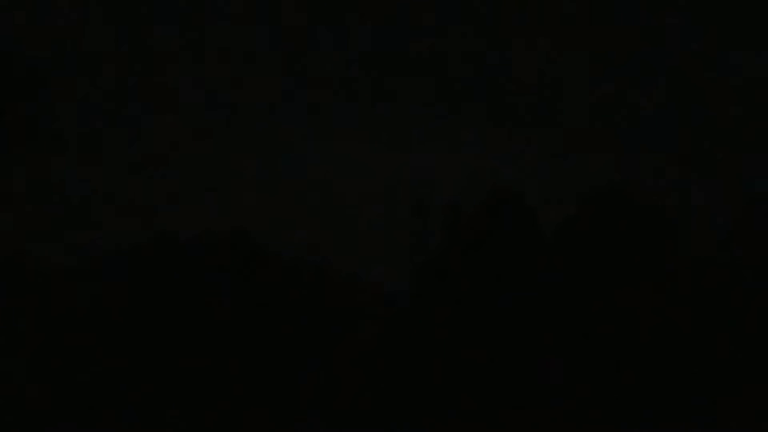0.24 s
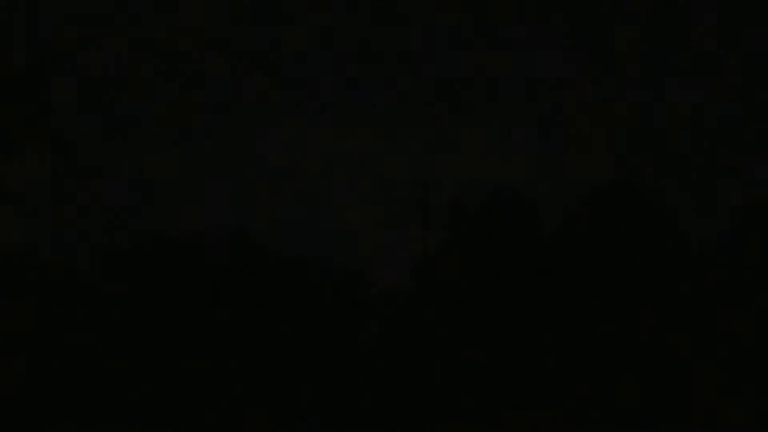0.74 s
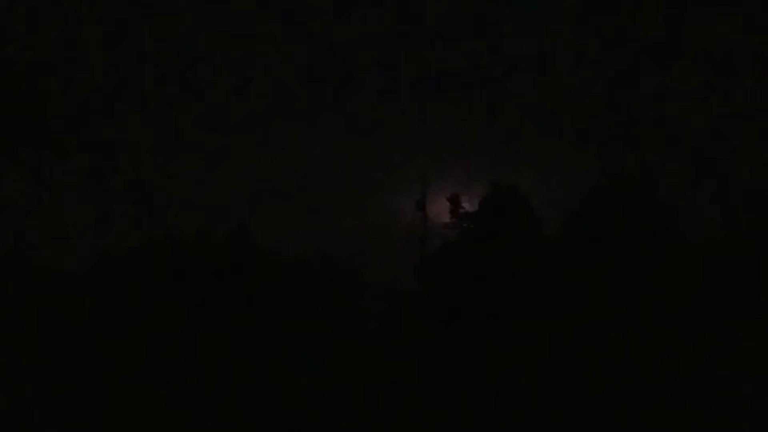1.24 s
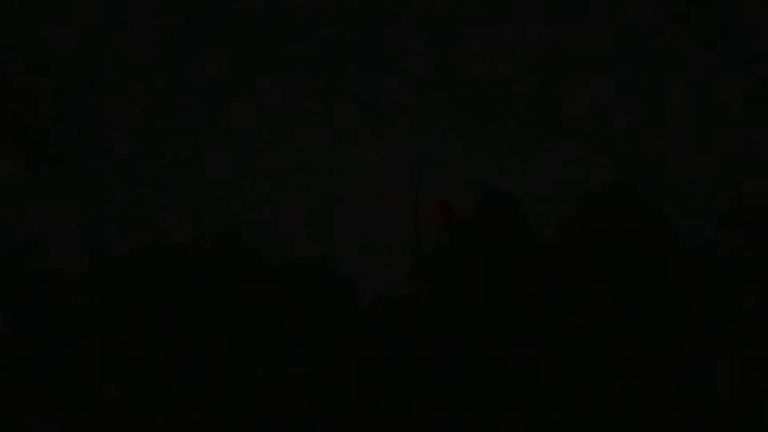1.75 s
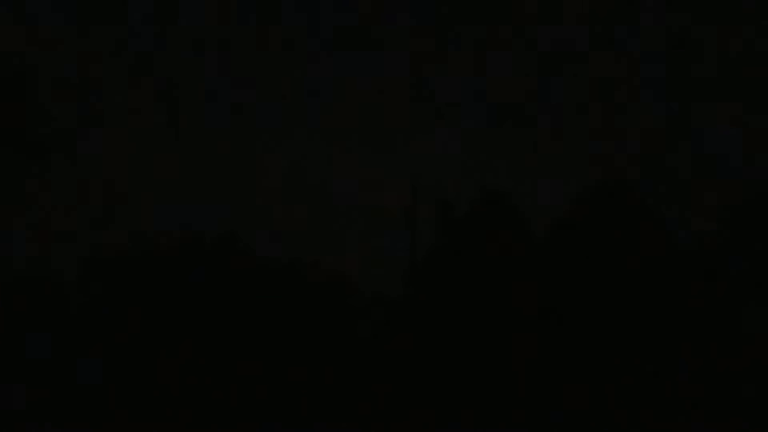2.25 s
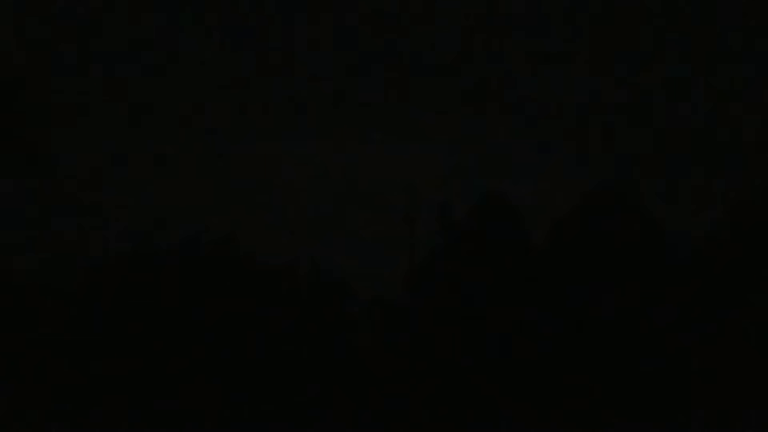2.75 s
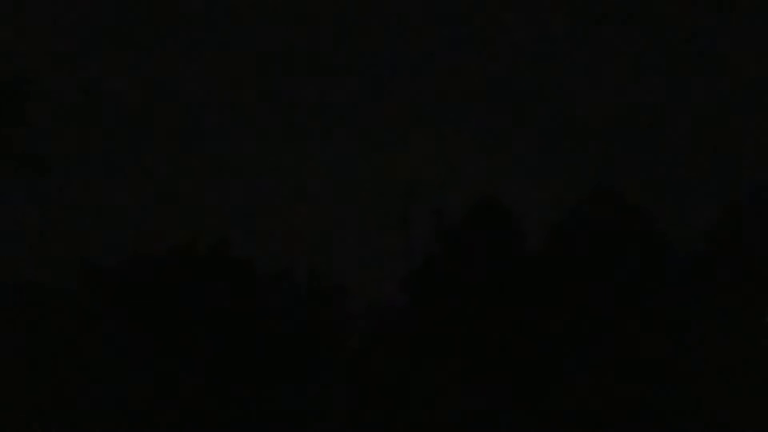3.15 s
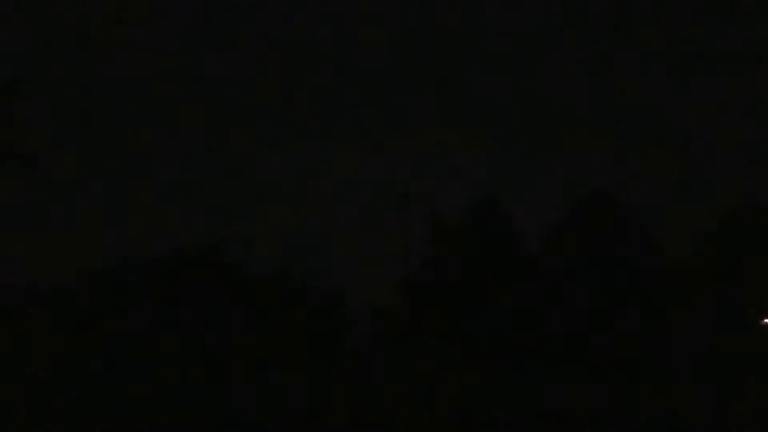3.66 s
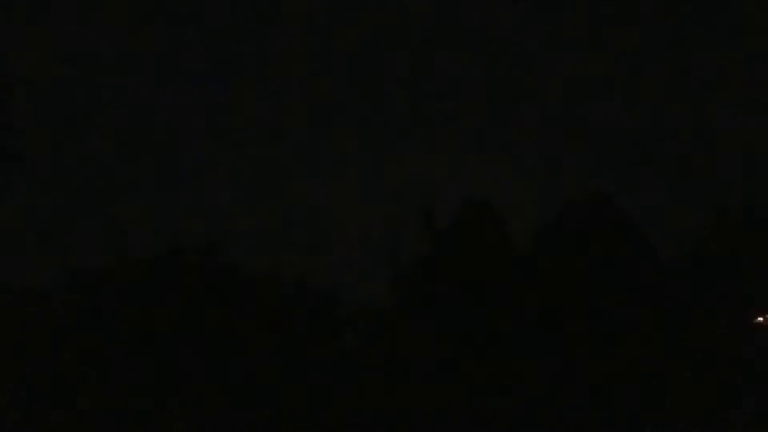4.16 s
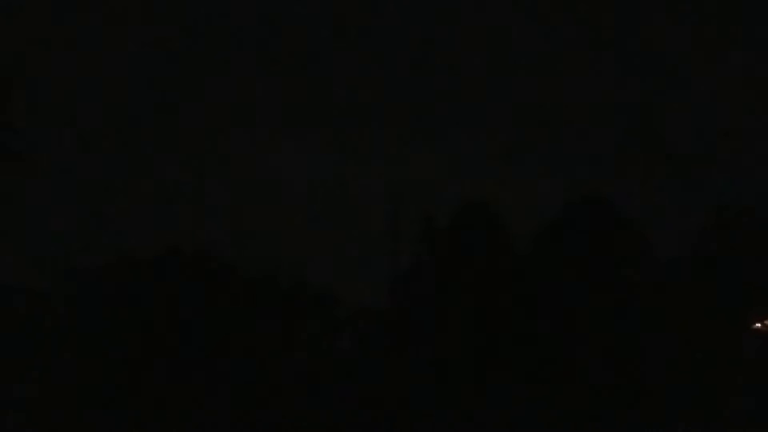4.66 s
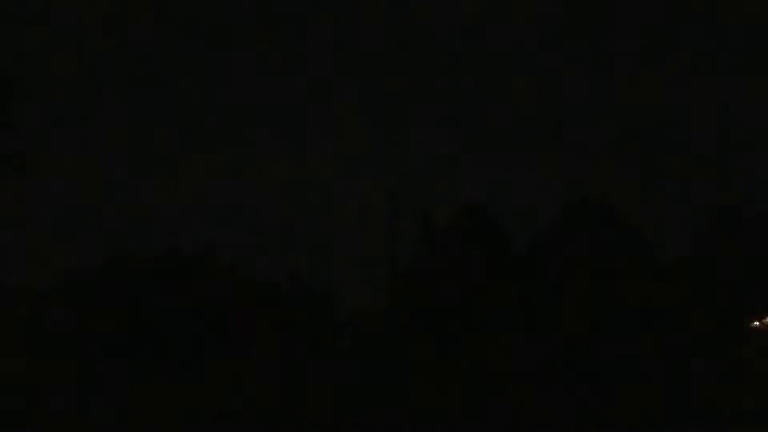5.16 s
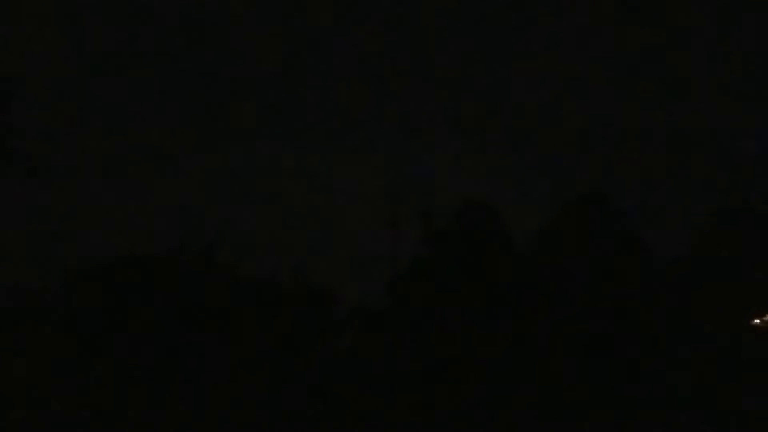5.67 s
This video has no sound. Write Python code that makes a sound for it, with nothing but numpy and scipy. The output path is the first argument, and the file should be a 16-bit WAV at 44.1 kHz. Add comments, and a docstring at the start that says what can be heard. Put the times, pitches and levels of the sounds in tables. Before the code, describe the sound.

Outdoors at night by dark trees, a katydid chorus rasps in step, swelling nearly twice a second, with a closer insect cutting in just ahead of most swells. Tree crickets trill steadily behind, and thin high chirps sit to the left. A low distant town rumble and hum lie underneath with faint air hiss. One dry tick comes late on the left. Wide stereo microphone, open air; the lightning is silent.

```python
"""Katydids rasp in step on a summer night at the edge of a wood, swelling almost twice a second.
A close leader cuts in ahead of the swells; all of them are random tooth strikes gated into syllables.
Tree crickets trill steadily behind as narrow, fluttering noise bands, and three small singers chirp
on the left as pulsed falling tones. A distant town adds filtered-noise rumble and wavering sine hum
under a hiss of air, and one faint dry tick, a very short tone burst, sounds near the end."""
import sys
import numpy as np
from scipy import signal
from scipy.fft import rfft, irfft, next_fast_len
from scipy.io import wavfile
from scipy.ndimage import map_coordinates

SR = 44100
rng = np.random.default_rng(int(sys.argv[2]) if len(sys.argv) > 2 else 0)


def waveform_to_disk(signal):
    """Save audio, clipped to [-1, 1], as 16-bit WAV at the path in sys.argv[1]."""
    frames = np.transpose(np.atleast_2d(signal))
    scaled = np.clip(frames, -1, 1) * 32767
    samples = np.round(scaled).astype(np.int16)
    wavfile.write(sys.argv[1], SR, samples)


N = 261513


def amp(db):
    """Decibels to gain."""
    return 10 ** (np.asarray(db) / 20)


def unit(x):
    """Scale to rms 1."""
    return x / np.sqrt(np.mean(x ** 2) + 1e-20)


def clock():
    """The time of every sample in seconds."""
    return np.arange(N) / SR


def noise():
    """Two unrelated channels of white noise."""
    return rng.standard_normal((2, N))


def along(points, hz):
    """Read (frequency, value) points on a log frequency axis."""
    f, v = np.transpose(points)
    return np.interp(np.log(hz + 1), np.log(f + 1), v)


def wobble(rate):
    """A smooth random curve with rate knots a second."""
    knots = rng.standard_normal(int(N * rate / SR) + 4)
    return map_coordinates(knots, [np.arange(N) * rate / SR])


def filtered(x, response):
    """Shape x by a response of frequency."""
    m = next_fast_len(N + 8192)  # spare room, so that the end does not wrap straight onto the start
    spectrum = rfft(x, m) * response(np.fft.rfftfreq(m, 1 / SR))
    return irfft(spectrum, m)[..., :N]


def coloured(x, spectrum):
    """Give x a spectrum, cut an octave below its first point, at rms 1."""
    lowest_hz = spectrum[0][0] / 2
    return unit(filtered(x, lambda hz: amp(along(spectrum, hz)) * (hz > lowest_hz)))


def pan(left_db):
    """Gains of the two channels for a source that is left_db louder on the left."""
    return amp([[left_db / 2], [-left_db / 2]])


def stereo(pair, alike, lag_ms):
    """Turn two unrelated signals into a left-right pair of given likeness; the right hears it later."""
    def turn(hz):
        return np.arccos(np.clip(along(alike, hz), -1, 1)) / 2

    mid, side = filtered(pair, lambda hz: np.array([np.cos(turn(hz)), np.sin(turn(hz))]))
    right = filtered(mid - side, lambda hz: np.exp(-2j * np.pi * hz * lag_ms / 1000))
    return np.array([mid + side, right])


def gains(rows):
    """Turn each dB column of a timed curve into one gain per sample."""
    s, *levels = np.transpose(rows)
    return [amp(np.interp(clock(), s, db)) for db in levels]


# Hiss of the night air: (frequency [Hz], relative level [dB])
AIR_SPECTRUM = [(500, -13), (1000, -5), (3000, 4), (6000, -5), (7500, -18.5), (10000, -14.5),
                (15500, -11.5)]


def night_air():
    """A steady, faint hiss of air: shaped noise, unrelated in the two channels."""
    return amp(-58.5) * coloured(noise(), AIR_SPECTRUM)


# Machines in the town: (frequency [Hz], level before wavering and panning [dB])
MACHINE_TONES = [(62, -75), (79.5, -67), (116.5, -62), (238.5, -79.5)]


def town_hum():
    """Machine tones: sines that waver slowly in level and phase."""
    hum = np.zeros(N)
    for hz, db in MACHINE_TONES:
        phase = 2 * np.pi * hz * clock() + 1.92 * wobble(4)
        hum += amp(db + 1.7 * wobble(3.78)) * np.sin(phase)
    return hum


# Level of the town: (time [s], deep rumble before trim [dB], traffic before trim [dB])
TOWN_LEVELS = [(0.0, -56.5, -55), (0.25, -60.5, -56), (1.5, -55.5, -58), (2.38, -62.5, -58),
               (2.75, -60, -56), (3.0, -57.5, -59), (3.6, -63, -57), (4.5, -59, -58.5),
               (5.93, -58.5, -57.5)]
# Spectrum of the deep rumble: (frequency [Hz], relative level [dB])
DEEP_SPECTRUM = [(18, -22), (28, -31), (42, -7), (62, -1), (85, 2.5), (105, -2.5), (150, -16), (300, -64)]
# Spectrum of the traffic: (frequency [Hz], relative level [dB])
TRAFFIC_SPECTRUM = [(50, -14.5), (90, -5), (120, -0.5), (155, -2), (190, -11.5), (250, -8), (320, -12.5),
                    (400, -13), (600, -19), (1100, -22.5), (2500, -37), (6000, -66)]
# How alike the rumble is left and right: (frequency [Hz], likeness [-1 to 1])
RUMBLE_LIKENESS = [(60, 0.98), (150, 0.98), (300, 1), (600, 0.51), (1400, 0.87)]


def town_rumble():
    """Far traffic: two low noise bands that rise and sink, reaching the left side first."""
    deep_gain, traffic_gain = gains(TOWN_LEVELS)
    deep = coloured(stereo(noise(), RUMBLE_LIKENESS, lag_ms=0.41), DEEP_SPECTRUM)
    traffic = coloured(stereo(noise(), RUMBLE_LIKENESS, lag_ms=0.41), TRAFFIC_SPECTRUM)
    return amp(-0.5) * deep_gain * deep + amp(0.87) * traffic_gain * traffic


def town():
    """Rumble and hum of the distant town, together a little louder on the right."""
    return (town_rumble() + town_hum()) * pan(left_db=-1.4)


# A lone tick in the leaves: (time [s], level before its envelope and panning [dB], frequency [Hz])
LEAF_TICK = (5.3205, -32, 3000)


def tick():
    """One dry tick on the left: a tone in a bell-shaped envelope only a couple of cycles long."""
    s, db, hz = LEAF_TICK
    cycles = hz * (clock() - s)
    return amp(db) * np.exp(-cycles ** 2) * np.sin(2 * np.pi * cycles) * pan(left_db=10)


# Steady trills of distant crickets: (centre [Hz], width to each side [Hz], relative level [dB])
TRILL_BANDS = [(2166, 230, -3), (2770, 100, 1.7), (3032, 27, 0), (3564, 153, -4.5), (5140, 290, -9),
               (6570, 290, -13.5)]


def tree_crickets():
    """Many distant trills merge into narrow noise bands, each fluttering a little in level."""
    out = np.zeros((2, N))
    for centre_hz, width_hz, db in TRILL_BANDS:
        band = filtered(noise(), lambda hz: 1 / (1 + ((hz - centre_hz) / width_hz) ** 2) ** 1.24)
        out += amp(db + 2.1 * wobble(45) + 0.4 * wobble(3.17)) * band
    return amp(-51.0) * unit(out) * pan(left_db=3.5)


def singer(times, pitch_hz, fall_hz, pulse_rate, duty, echo_db, count):
    """Each chirp is count wing strokes; the tone falls through each stroke as the wing slows."""
    t = np.arange(int(count / pulse_rate * SR)) / SR
    pulse = (t * pulse_rate).astype(int)
    out = np.zeros(N + 2 * SR)  # a second to spare at both ends
    # the wing rests, silent, for the part of each pulse beyond duty
    stroke = np.minimum(t * pulse_rate % 1 / np.clip(duty, .1, 1), 1)
    chirp_shape = np.abs(np.sin(np.pi * t / t[-1])) ** .5
    swell = np.sin(np.pi * stroke) * chirp_shape
    for s in times:
        stroke_hz = pitch_hz * (1 + 0.0038 * rng.standard_normal(count))
        hz = stroke_hz[pulse] - fall_hz * (stroke - .5)
        size = amp(1.8 * rng.standard_normal(count))[pulse]
        start = int((s - t[-1] / 2) * SR) + SR
        out[start:][:len(t)] += size * swell * np.sin(2 * np.pi * np.cumsum(hz) / SR)
    direct = out[SR:SR + N]
    # the grass and the bushes answer with a short scattered tail, down 60 dB in 0.13 s
    tail = rng.standard_normal((2, SR // 4)) * amp(-60 * np.arange(SR // 4) / SR / 0.13)
    tail /= np.linalg.norm(tail[0])
    return direct + amp(echo_db) * signal.fftconvolve(direct[None], tail, axes=1)[:, :N]


def rippler():
    """A slow-stroked cricket near 7 kHz, whose five strokes are heard as a ripple."""
    times = np.arange(0.06, N / SR, 0.283)
    song = singer(times, pitch_hz=6930, fall_hz=200, pulse_rate=36, duty=.85, echo_db=-2, count=5)
    return amp(-66) * song * pan(left_db=12)


def buzzer():
    """A faint buzz four times a second: ten rapid wing strokes whose level drifts."""
    times = np.arange(.02, N / SR, 1 / 4)
    song = singer(times, pitch_hz=8430, fall_hz=700, pulse_rate=85, duty=.8, echo_db=-2, count=10)
    return amp(-71.5 + wobble(4)) * song * pan(left_db=11)


def beats(pace):
    """Times of calls that follow a curve of calls a second."""
    done = np.cumsum(np.interp(clock(), *np.transpose(pace))) / SR
    return np.interp(np.arange(.5, done[-1]), done, clock())


# Pace of the highest singer: (time [s], rate [chirps/s])
CHIRPER_PACE = [(0, 5.72), (2.2, 5.48), (2.7, 5.19), (3.8, 5.66), (4.25, 5.24), (4.7, 6.59), (5.2, 5.5),
                (5.93, 5.74)]


def chirper():
    """A quick high singer near 9 kHz: seven steeply falling strokes a chirp, at a varying pace."""
    song = singer(beats(CHIRPER_PACE), pitch_hz=8950, fall_hz=950, pulse_rate=105, duty=.9,
                  echo_db=-3, count=7)
    return amp(-67.2 + wobble(5)) * song * pan(left_db=13)


def loudness(calls, rise_db_per_s, fall_db_per_s):
    """Summed power over time of calls (start, length, dB) that rise, hold and die away."""
    t, power = clock(), 0
    for s, length, db in calls:
        rise = rise_db_per_s * np.maximum(s - t, 0)
        fall = fall_db_per_s * np.maximum(t - s - length, 0)
        power = power + amp(db - rise - fall) ** 2
    return power


# Swells of the chorus: (loudest syllable [s], crest before it [s], crest after it [s], strength [dB])
CHORUS_SWELLS = [(0.005, .2, .01, -6), (0.377, 0.12, 0.04, 1), (0.922, 0.083, 0.076, 1),
                 (1.519, 0.13, 0.079, 1), (2.092, 0.13, 0.11, 0), (2.599, 0.05, 0.13, .4),
                 (3.183, 0.093, 0.08, -.4), (3.687, .058, 0.11, .5), (4.288, 0.11, 0.13, -0.9),
                 (4.859, 0.13, .055, -.2), (5.406, 0.14, 0.09, -0.5), (5.912, 0.11, .084, -1)]
# One close katydid, abrupt, ahead of each swell after the first:
# (start [s], length [s], strength [dB])
LEADER_CALLS = [(0.18, 0.28, 1.5), (0.62, 0.49, -5), (1.24, 0.31, -4.0), (1.87, 0.3, 0.5), (2.44, 0.37, -2),
                (2.96, 0.33, -4.5), (3.49, 0.28, 1.5), (4.03, 0.33, 1.4), (4.65, 0.44, -1),
                (5.2, 0.25, -0.2), (5.73, 0.3, -0.5)]
# Lone syllables between the swells: (start [s], length [s], strength [dB])
STRAY_SYLLABLES = [(0.54, .04, -2), (3.95, .03, -2.5), (5.02, .06, -3), (5.63, 0.026, 0)]
SYLLABLE_RATE = 11.8  # throb of the swells [syllables/s]
IN_STEP_S = 0.15  # how far either side of the loudest syllable the singers stay in step [s]


def effort(swell_db, rise_db_per_s, fall_db_per_s, syllable_db, leader_db, stray_db, steady_db):
    """Gain of one chorus part: the powers of swells, leader, lone syllables and non-stop singers add."""
    since = clock() - np.array(CHORUS_SWELLS)[:, :1]
    in_step = np.exp(-(since / IN_STEP_S) ** 2)
    throb = np.sum(np.cos(2 * np.pi * SYLLABLE_RATE * since) * in_step, axis=0)
    crests = [(s - before, before + after, db) for s, before, after, db in CHORUS_SWELLS]
    swells = amp(swell_db + syllable_db * throb) ** 2 * loudness(crests, rise_db_per_s, fall_db_per_s)
    leader = amp(leader_db) ** 2 * loudness(LEADER_CALLS, rise_db_per_s=800, fall_db_per_s=450)
    strays = amp(stray_db) ** 2 * loudness(STRAY_SYLLABLES, rise_db_per_s=700, fall_db_per_s=500)
    return np.sqrt(swells + leader + strays + amp(steady_db) ** 2)


def rasps(syllable_rate, tooth_rate, echo_db, count):
    """Katydids scrape in syllables, each a run of tooth strikes; the trees smear a part into a wash."""
    t, out = clock(), np.zeros((2, N))
    for _ in range(count):
        stroke = syllable_rate * t + rng.random() + 0.26 * wobble(1.98)
        pressure = np.sin(np.pi * stroke) ** 2
        teeth = np.cumsum(tooth_rate * np.exp(.25 * wobble(60))) / SR
        strikes = np.diff(np.floor(teeth), prepend=0) * pressure
        # leaves scatter each strike differently on its way to the two sides
        out += strikes * noise()
    return unit(out) + amp(echo_db) * noise()


# Wing colour of the far crowd: (frequency [Hz], relative level [dB])
FAR_WING_COLOUR = [(900, -37.5), (1350, -16.5), (1700, -11.5), (2130, 0), (2500, -4), (2800, -2),
                   (3150, -2.5), (3600, -3), (4100, -12.5), (5200, -15), (8000, -63)]


def far_katydids():
    """The far crowd is dull and blurred: four rasping voices under a strong wash."""
    gain = effort(swell_db=-44.0, rise_db_per_s=78, fall_db_per_s=59, syllable_db=1.0,
                  leader_db=-53, stray_db=-62, steady_db=-53)
    crowd = rasps(syllable_rate=11.5, tooth_rate=800, echo_db=4.5, count=4)
    # left-right likeness: (frequency [Hz], likeness [-1 to 1])
    crowd = stereo(crowd, [(1500, -0.43), (2300, 0.38), (2900, 0.41), (3600, -0.34)], lag_ms=0)
    return gain * coloured(crowd, FAR_WING_COLOUR) * pan(left_db=4.0)


# Wing colour of the near group: (frequency [Hz], relative level [dB])
NEAR_WING_COLOUR = [(2800, -24.5), (3900, -6.5), (4550, 1), (5150, 1), (5600, -4.5), (6200, -9.5),
                    (6900, -16.5), (7500, -23), (8100, -24.5), (10000, -32)]
# Top sizzle of the near group: (frequency [Hz], relative level [dB])
SIZZLE_COLOUR = [(8500, -40), (10000, -36), (11000, -12.5), (12000, -5), (13500, -2.5), (14500, 0.5),
                 (15600, 1.5)]
# Balance of the near group: (frequency [Hz], left minus right [dB])
NEAR_BALANCE = [(3900, 2), (4900, -.5), (6000, 3.5), (7400, 8.5), (9800, 0), (13000, .5), (14500, 4.5)]


def near_katydids():
    """The near group adds grain and top sizzle: the same rasps in two bands, each with its own swell."""
    body_gain = effort(swell_db=-48.0, rise_db_per_s=120, fall_db_per_s=53, syllable_db=1.5,
                       leader_db=-52, stray_db=-52.5, steady_db=-71)
    sizzle_gain = effort(swell_db=-50.0, rise_db_per_s=103, fall_db_per_s=90, syllable_db=1.0,
                         leader_db=-54.2, stray_db=-74, steady_db=-80)
    group = rasps(syllable_rate=11.3, tooth_rate=1300, echo_db=7.0, count=3)
    # left-right likeness: (frequency [Hz], likeness [-1 to 1])
    group = stereo(group, [(4000, 0.0), (5000, 0.44), (6000, 0)], lag_ms=0)
    # each near singer sits in its own place, so the balance changes with pitch
    group = filtered(group, lambda hz: amp(np.outer([.5, -.5], along(NEAR_BALANCE, hz))))
    return body_gain * coloured(group, NEAR_WING_COLOUR) + sizzle_gain * coloured(group, SIZZLE_COLOUR)


def scene():
    """All the night's voices together, from the background to the katydids."""
    background = night_air() + town() + tick() + tree_crickets()
    grass_singers = rippler() + buzzer() + chirper()
    return background + grass_singers + far_katydids() + near_katydids()


def record(dry):
    """Keep nothing above the band limit of 15.8 kHz."""
    return filtered(dry, lambda hz: hz < 15800)


dry = scene()
out = record(dry)
waveform_to_disk(out)
```